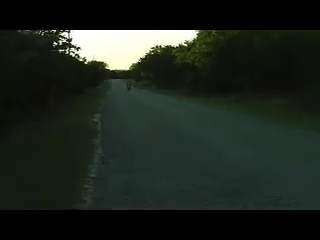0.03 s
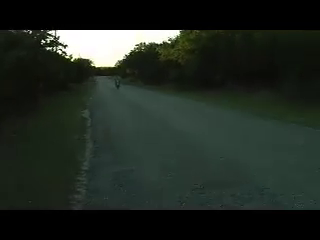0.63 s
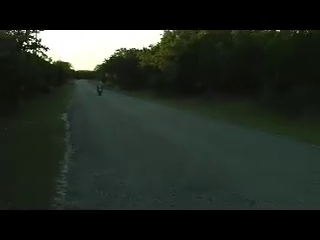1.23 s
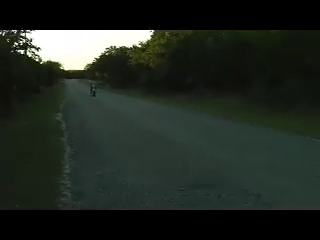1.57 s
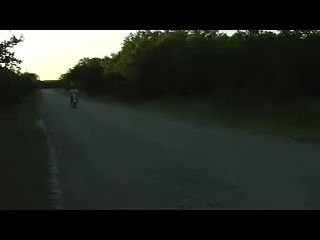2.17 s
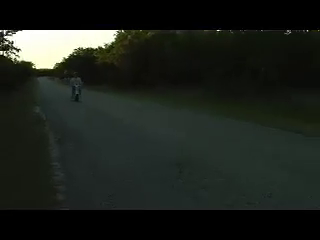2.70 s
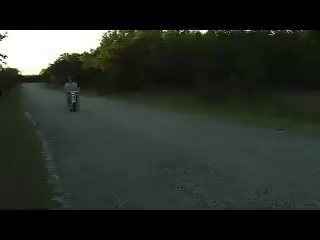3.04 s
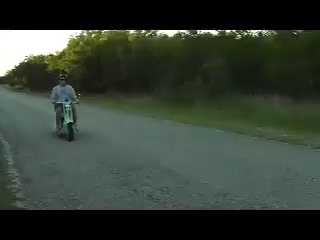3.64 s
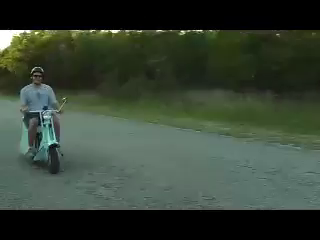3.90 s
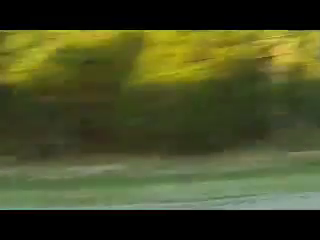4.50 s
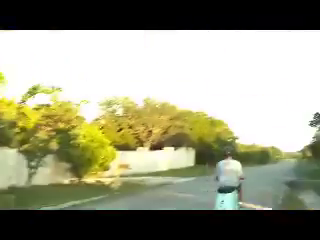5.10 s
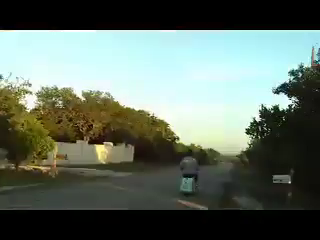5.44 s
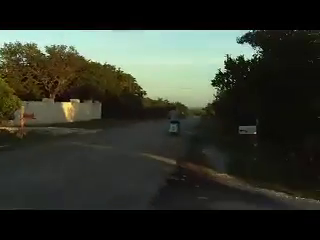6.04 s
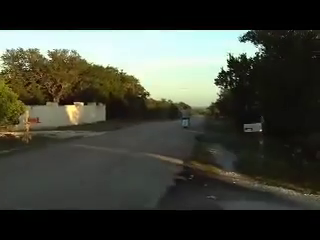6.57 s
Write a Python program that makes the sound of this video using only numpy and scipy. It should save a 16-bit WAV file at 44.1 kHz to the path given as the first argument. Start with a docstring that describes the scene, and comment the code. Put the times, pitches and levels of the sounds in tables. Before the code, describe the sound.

On a quiet country road, fingers click and rub on a hand-held camera's plastic case while an electric scooter approaches. Its tyres roar and drum louder on the coarse surface until it passes at arm's length, snapping small stones, dropping in pitch and briefly overloading the microphone with rumble and fizz. A thin motor whine trails away with the tyres, and fingers scuff the case again.

```python
"""A hand-held camera's plastic case clicks and rustles as an electric scooter approaches on a coarse road.
Its treads roar on the chips and its tyre casings drum, changing colour from front to side to rear.
At 4.5 s it passes at arm's length: wheels and drive ring, stones snap, the pitch drops, the wake rumbles
and the microphone overloads with a bright fizz. The motor whines thinly as the scooter rolls away,
and fingers scuff the case again over faint countryside and breeze."""
import sys
import numpy as np
from scipy import signal
from scipy.fft import rfft, irfft, next_fast_len
from scipy.io import wavfile
from scipy.ndimage import map_coordinates

SR = 44100
rng = np.random.default_rng(int(sys.argv[2]) if len(sys.argv) > 2 else 0)


def master(y):
    """Save y as 16-bit WAV."""
    cut = np.clip(np.atleast_2d(y).T, -1, 1)
    pcm = np.round(cut * 32767)  # scale
    wavfile.write(sys.argv[1], SR, pcm.astype(np.int16))


N = 297846

PASS_S, SPEED_M_PER_S, GAP_M = 4.52, 9.0, 1.7

# Levels are relative; widths and lengths span two standard deviations of a bell.
# tread roar from three sides (frequency [Hz], density [dB])
ROAR_FRONT = [(250, -29.5), (480, -4.5), (610, 1.5), (760, 4), (980, -1.5), (1260, -6.5), (1480, -6.5),
              (1620, -13), (1770, -24), (2100, -20.5), (3400, -31), (5200, -40), (6600, -75), (8000, -110),
              (16000, -120)]
ROAR_SIDE = [(250, -27.5), (510, -17.5), (670, -2), (800, -3.5), (950, 1.5), (1250, -8), (1680, -6),
             (1930, -19.5), (2400, -18), (3500, -31), (4400, -33.5), (6000, -42.5), (6800, -62),
             (8000, -94), (16000, -120)]
ROAR_REAR = [(250, -33), (480, -10), (650, 2), (770, -2), (940, -8), (1150, -4), (1450, -13.5),
             (1900, -21.5), (2250, -21.5), (3000, -28.5), (5000, -37.5), (6800, -77), (8000, -110),
             (16000, -120)]
# peaks and notches from front wheel and fork (frequency [Hz], width [Hz], gain [dB])
FORK_PEAKS = [(984, 81, -5.5), (1026, 70, 4.5), (1436, 17, 5.5), (1780, 59, -14), (2255, 65, 8),
              (2520, 120, -3), (2680, 45, 8.5), (3400, 260, 5.5), (3700, 140, -4.5), (4340, 300, 1.5),
              (5170, 420, 4)]
# drumming of casings and panels (frequency [Hz], density [dB])
DRUM_FRONT = [(50, -27), (110, -10.5), (155, -11), (225, 1), (275, -1.5), (320, -6), (380, -3), (470, -19),
              (800, -34), (3000, -83)]
DRUM_REAR = [(50, -35.5), (115, -3.5), (165, -1), (225, 0), (310, -1.5), (400, -5.5), (490, -14),
             (800, -40.5), (3000, -80)]
# rough stretches of road (time [s], length [s], roar gain [dB], drum gain [dB])
ROUGH_ROAD = [(0.643, 0.29, 0.5, 5), (2.597, 0.083, 1.5, 2), (3.528, 0.19, 1, 1), (3.733, 0.04, 2.5, 3.5),
              (4.068, 0.14, 0.7, 1.5), (4.324, 0.11, 3.5, 0), (4.657, 0.14, 2, -0.7), (5.365, 0.13, 2.5, 1),
              (5.728, 0.11, 2, 3)]
# wheel and drive resonances (frequency [Hz], width [Hz], level [dB], time [s], sigma [s])
DRIVE_MODES = [(224.4, 12, -5.5, 3.8, 0.093), (4200, 970, -27, 4.34, 0.081), (131.3, 17, -13.5, 4.55, 0.19),
               (1224, 42, -8.5, 4.55, 0.07), (956, 60, -13, 4.6, 0.15), (399, 56, -5, 4.63, 0.072),
               (1498, 34, -14.5, 4.88, 0.065), (678, 180, -6.5, 4.89, 0.09)]
# motor whine swells (peak time [s], level [dB])
WHINE_SWELLS = [(4.98, -22), (5.8, -36)]
# stones snapping from under the tread (time [s], level [dB], frequency [Hz])
STONE_SNAPS = [(4.3072, -10, 2850), (4.353, -8, 2450), (4.4014, -15.5, 3600), (4.4432, -11.5, 2730),
               (4.5022, -12, 3220), (4.567, -11, 2870), (4.5896, -10.5, 2640)]
# loose chips under the tyres (time [s], length [s], level [dB])
CHIP_CRUNCHES = [(3.882, 0.025, -28), (3.939, .03, -24.5), (4.043, .02, -24.5), (4.098, 0.011, -20),
                 (4.166, 0.01, -14.5)]
# chip crunch (frequency [Hz], density [dB])
CHIP_SPECTRUM = [(400, -20), (1200, 11.5), (2000, -12), (4200, -7), (6000, -27), (8000, -70), (16000, -120)]
# brief bright crackles of microphone clipping (time [s], length [s], level [dB])
OVERLOAD_TICKS = [(4.097, .002, -46.5), (4.171, .005, -49.5), (4.23, 0.0055, -56.5), (4.292, .006, -50.5),
                  (4.418, 0.011, -46), (4.695, .003, -51.5), (4.71, 0.0027, -53), (4.73, .003, -52.5),
                  (4.758, .002, -53.5)]
# fizz of the overloaded microphone (frequency [Hz], density [dB])
OVERLOAD_HISS_SPECTRUM = [(3000, -24), (6500, 1), (8000, -4), (11000, -8), (16000, -11.5)]
# camera case clicks (time [s], level [dB], low cut [Hz], high cut [Hz])
CASE_CLICKS = [(.0048, -14, 1180, 6600), (0.0135, -16, 1000, 5700), (1.138, -28.5, 900, 1900),
               (1.4847, -12.5, 1200, 5530), (1.509, -17.5, 1900, 6500), (1.985, -26, 1000, 3400),
               (2.0015, -25, 800, 2600), (2.0308, -29, 1800, 3400), (2.4724, -13, 1400, 5600),
               (2.4791, -24, 4300, 6230), (3.49, -24.5, 4200, 5400), (6.4049, -18.5, 1000, 4200),
               (6.4085, -31.5, 3000, 6060), (6.5945, -25, 2000, 3350)]
# plastic case modes (frequency [Hz], level [dB], T60 [s])
CASE_MODES = [(1180, -9, .008), (1615, -5, .014), (2100, -8, .009), (2710, -11, .008), (2990, -7, .009),
              (3700, -10, .008), (4190, -5, .007), (4580, -.5, .0065), (5405, -4, .007), (6200, -14, .005),
              (6950, -19, .004)]
# strokes on the case (time [s], length [s], level [dB])
FINGER_RUBS = [(1.99, 0.016, -27.5), (2.035, 0.039, -32), (5.288, 0.03, -29), (5.37, 0.065, -36),
               (6.337, 0.036, -32.5), (6.381, 0.022, -28.5), (6.418, 0.021, -27.5), (6.666, 0.22, -31.5)]
PALM_DRAGS = [(1.982, 0.0042, -22), (2.004, 0.01, -25), (2.068, .012, -23)]
# finger and palm friction (frequency [Hz], density [dB])
RUB_SPECTRUM = [(400, -32.5), (1000, 7), (1600, 9.5), (2100, -0.5), (3000, -0.5), (4500, -17),
                (6000, -23.5), (7300, -38.5), (8300, -70), (16000, -120)]
DRAG_SPECTRUM = [(500, -25), (900, 5), (1200, 2), (1600, -1), (1900, -20), (3000, -23), (6000, -51),
                 (9000, -120)]
# soft hand bumps (time [s], level [dB], frequency [Hz])
HAND_BUMPS = [(0.005, -8, 265), (0.175, -10, 130), (1.4854, -10, 250), (1.4855, -13, 540),
              (1.651, -13, 151)]
# air puffs on the microphone (time [s], length [s], level [dB])
AIR_PUFFS = [(0.7, 0.43, -47), (2.135, 0.14, -35), (2.699, 0.18, -41), (3.492, 0.16, -27),
             (4.227, .2, -25.5), (5.197, 0.088, -38.5), (6.05, .12, -43)]
# wake, breeze, and countryside with microphone hiss (frequency [Hz], density [dB])
WAKE_SPECTRUM = [(10, -18), (30, -1), (48, -4.5), (72, 5), (110, -6), (200, -29), (1000, -82),
                 (4000, -120)]
BREEZE_SPECTRUM = [(10, -11.5), (32, -2.5), (55, -2.5), (120, -24), (1000, -76.5), (4000, -120)]
FLOOR_SPECTRUM = [(40, -6.5), (130, 1), (450, -3.5), (750, 1.5), (960, -9), (1170, 5.5), (1450, -12),
                  (1750, -11), (2700, -13), (4000, -19), (5300, -23), (6500, -35.5), (7200, -50.5),
                  (8000, -93), (16000, -120)]


def scooter(roar_db=-5.5, drum_db=-7.5, drive_db=-2.5, shadow_db=-4.0, shadow_m=6.2, shadow_sigma_m=4.9):
    """Tyres and drive swell and fade with distance and rough road; past the camera the body masks them."""
    t = clock()
    roar_gain_db = carry_db(front_db=-0.24, rear_db=0.4, ground_db_per_m=0.45)
    roar_gain_db += shadow_db * bell(SPEED_M_PER_S * (t - PASS_S), shadow_m, shadow_sigma_m)
    drum_gain_db = carry_db(front_db=-1.0, rear_db=-3.0, ground_db_per_m=0.86)
    for time_s, length_s, extra_roar_db, extra_drum_db in ROUGH_ROAD:
        stretch = bell(t, time_s, length_s / 2)
        roar_gain_db += extra_roar_db * stretch
        drum_gain_db += extra_drum_db * stretch
    roar = amp(roar_db) * tread() + amp(drive_db) * drive()
    return amp(roar_gain_db) * roar + amp(drum_gain_db + drum_db) * casing()


def tread(beam_power=2.56, chip_db=0.5, patch_db=1.0):
    """The tread rattles over chips; the wedge between tyre and road beams the roar fore and aft."""
    _, heading = path()
    front = np.clip(-heading, 0, 1) ** beam_power
    rear = np.clip(heading, 0, 1) ** beam_power
    side = np.clip(1 - front - rear, 0, 1)
    aspects = [(front, noise(ROAR_FRONT, FORK_PEAKS)), (side, noise(ROAR_SIDE)), (rear, noise(ROAR_REAR))]
    roar = sum(np.sqrt(share) * doppler(sound) for share, sound in aspects)
    return roar * amp(chip_db * wobble(220) + patch_db * wobble(25))


def casing(steepness=1.23, swap_heading=-0.083, jolt_db=0.5):
    """Road bumps drum on tyre casings and panels, deeper from the rear."""
    _, heading = path()
    rear = (1 + np.tanh(steepness * (heading - swap_heading))) / 2
    drum = np.sqrt(1 - rear) * noise(DRUM_FRONT) + np.sqrt(rear) * noise(DRUM_REAR)
    return doppler(drum) * amp(jolt_db * wobble(30))


def drive():
    """Wheels and drive ring in noise bands, each heard while its side faces the camera."""
    whirr = np.zeros(N)
    for hz, width_hz, db, time_s, sigma_s in DRIVE_MODES:
        band = unit(filtered(rng.standard_normal(N), lambda f: bell(f, hz, width_hz / 2)))
        whirr += amp(db) * bell(clock(), time_s, sigma_s) * band
    return doppler(whirr)


def motor(whine_hz=1178, flutter_db=-1.0, rise_db_per_s=76, fade_db_per_s=31):
    """The rear motor sings one note that swells fast, fades slowly and wavers with the road."""
    t = clock()
    hz = whine_hz + 5 * wobble(9) + 12 * wobble(90)
    flutter = amp(flutter_db * wobble(25))
    note = np.sqrt(2) * np.sin(2 * np.pi * np.cumsum(hz) / SR)
    swells = sum(amp(db - np.maximum(rise_db_per_s * (peak_s - t), fade_db_per_s * (t - peak_s)))
                 for peak_s, db in WHINE_SWELLS)
    return swells * flutter * doppler(note)


def stones(count=110, centre_s=4.48, span_s=0.42, top_db=-16, span_db=14, centre_hz=3100, span_oct=1.05,
           rise_cycles=1.6):
    """Tyres pinch small stones: a few loud snaps in a random crackle of weaker ones."""
    track, t = np.zeros(N), np.arange(SR // 100) / SR
    crackle = [(centre_s + span_s * (when - 0.5),
                top_db - span_db * weakness,
                centre_hz * 2 ** (span_oct * (pitch - 0.5)))
               for when, weakness, pitch in rng.random((count, 3))]
    for time_s, db, hz in STONE_SNAPS + crackle:
        age = hz * t / rise_cycles
        envelope = (age * np.exp(1 - age)) ** 2
        add(track, time_s, amp(db) * envelope * np.sin(2 * np.pi * hz * t))
    return track


def chips():
    """Loose chips crunch under the tyres."""
    return bursts(CHIP_CRUNCHES) * noise(CHIP_SPECTRUM)


def overload_hiss(hiss_db=-55, centre_s=4.48, half_length_s=0.215, grain_db=1.5):
    """Timed bright noise: the fizz and crackle of the microphone clipping at the pass."""
    window = np.exp(-((clock() - centre_s) / half_length_s) ** 12)
    hiss = window * amp(hiss_db + grain_db * wobble(200))
    return (hiss + bursts(OVERLOAD_TICKS)) * noise(OVERLOAD_HISS_SPECTRUM)


def clicks(slip_s=0.003):
    """The case slips under the fingers; the chatter rings its short modes."""
    track, t = np.zeros(N), np.arange(SR // 25) / SR
    ring = sum(amp(db - 60 * t / t60_s) * np.sin(2 * np.pi * hz * t) for hz, db, t60_s in CASE_MODES)
    for time_s, db, low_hz, high_hz in CASE_CLICKS:
        snap = signal.fftconvolve(chatter(t, slip_s), ring)[:len(t)]
        snap = signal.sosfilt(signal.butter(2, low_hz, "high", fs=SR, output="sos"), snap)
        snap = signal.sosfilt(signal.butter(9, high_hz, fs=SR, output="sos"), snap)
        slip_rms = np.sqrt(np.sum(snap ** 2) / (slip_s * SR))
        add(track, time_s, amp(db) * snap / slip_rms)
    return track


def chatter(t, slip_s, passes=8):
    """One slip: a short random burst, whitened by repeatedly keeping only its phase."""
    window = np.exp(-(t / slip_s) ** 4)
    burst = rng.standard_normal(len(t)) * window
    for _ in range(passes):
        phase = np.angle(rfft(burst))
        burst = irfft(np.exp(1j * phase), len(t)) * window
    return burst


def hand(catch_db=1.8, bump_rise_s=0.00048, bump_t60_s=0.011):
    """Fingers rub and catch, the palm drags lower, and soft skin bumps the case."""
    catches = amp(catch_db * wobble(300))
    track = bursts(FINGER_RUBS) * unit(noise(RUB_SPECTRUM) * catches)
    track += bursts(PALM_DRAGS) * noise(DRAG_SPECTRUM)
    t = np.arange(SR // 10) / SR
    press = 1 - np.exp(-(t / bump_rise_s) ** 2)
    for time_s, db, hz in HAND_BUMPS:
        add(track, time_s, amp(db - 60 * t / bump_t60_s) * press * np.sin(2 * np.pi * hz * t))
    return track


def air(wake_db=-18.5, breeze_db=-41, floor_db=-37):
    """Wake and puffs rumble on the microphone over a faint breeze, countryside and hiss."""
    rumble = (amp(wake_db + spreading_db()) + bursts(AIR_PUFFS)) * noise(WAKE_SPECTRUM)
    return rumble + amp(breeze_db) * noise(BREEZE_SPECTRUM) + amp(floor_db) * noise(FLOOR_SPECTRUM)


def path():
    """Scooter distance [m] and heading: -1 coming, 0 abreast, 1 leaving."""
    along_m = SPEED_M_PER_S * (clock() - PASS_S)
    distance_m = np.hypot(along_m, GAP_M)
    return distance_m, along_m / distance_m


def doppler(x, sound_m_per_s=343):
    """Delay by travel time, so pitch drops at the pass."""
    delay_s = path()[0] / sound_m_per_s
    return map_coordinates(x, [(clock() - delay_s) * SR], mode="wrap")


def spreading_db():
    """Level re closest point: -6 dB per doubling of distance."""
    return 20 * np.log10(GAP_M / path()[0])


def carry_db(front_db, rear_db, ground_db_per_m, far_m=24.2):
    """Spreading, front or rear bias, and ground loss beyond far_m."""
    distance_m, heading = path()
    facing_db = front_db * np.clip(-heading, 0, 1) + rear_db * np.clip(heading, 0, 1)
    return spreading_db() + facing_db - ground_db_per_m * np.maximum(distance_m - far_m, 0)


def amp(db):
    """Decibels to gain."""
    return 10 ** (np.asarray(db) / 20)


def unit(x):
    """Scale to rms 1."""
    return x / np.sqrt(np.mean(x ** 2) + 1e-20)


def clock():
    """Sample times [s]."""
    return np.arange(N) / SR


def bell(x, centre, sigma):
    """Gaussian of height 1."""
    return np.exp(-0.5 * ((x - centre) / sigma) ** 2)


def bursts(rows):
    """Envelope of one bell per row."""
    return sum(amp(db) * bell(clock(), time_s, length_s / 2) for time_s, length_s, db in rows)


def wobble(rate_hz):
    """Smooth random curve, rate_hz knots per second."""
    knots = rng.standard_normal(int(N * rate_hz / SR) + 4)
    return map_coordinates(knots, [clock() * rate_hz])


def filtered(x, response):
    """Apply a frequency response."""
    size = next_fast_len(N + 8192)
    return irfft(rfft(x, size) * response(np.fft.rfftfreq(size, 1 / SR)), size)[:N]


def noise(spectrum, peaks=()):
    """Noise of rms 1 with a spectral outline and narrow peaks."""
    knot_hz, knot_db = np.transpose(spectrum)
    outline_db = lambda hz: np.interp(np.log(hz + 1), np.log(knot_hz), knot_db)
    peaks_db = lambda hz: sum(db * bell(hz, mid_hz, width_hz / 2) for mid_hz, width_hz, db in peaks)
    return unit(filtered(rng.standard_normal(N), lambda hz: amp(outline_db(hz) + peaks_db(hz))))


def add(track, time_s, sound):
    """Mix sound into track at time_s."""
    tail = track[max(round(time_s * SR), 0):][:len(sound)]
    tail += sound[:len(tail)]


def scene(lowpass_hz=6700):
    """Mono mix: low-passed scooter, air, hand on the camera, road debris and overload hiss."""
    roar = filtered(scooter() + motor(), lambda hz: 1 / np.sqrt(1 + (hz / lowpass_hz) ** 24))
    return (roar + air() + clicks() + hand() + chips() + stones() + overload_hiss())[None]


def record(dry, ceiling=0.92, hardness=10.5, coupling_hz=10, top_hz=15730):
    """The input rounds off peaks, its coupling tilts the flat tops, and the band ends at top_hz."""
    clipped = dry[0] / (1 + np.abs(dry[0] / ceiling) ** hardness) ** (1 / hardness)
    return filtered(clipped, lambda hz: 1j * hz / (coupling_hz + 1j * hz) * (hz < top_hz))[None]


dry = scene()
out = record(dry)
master(out)
```